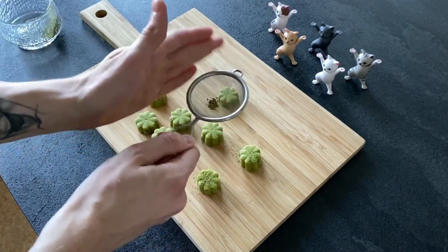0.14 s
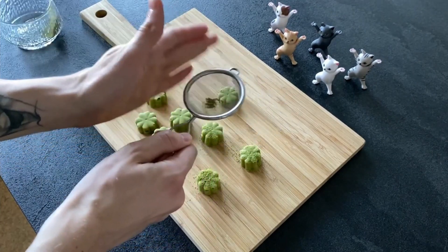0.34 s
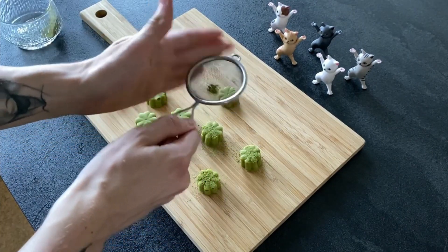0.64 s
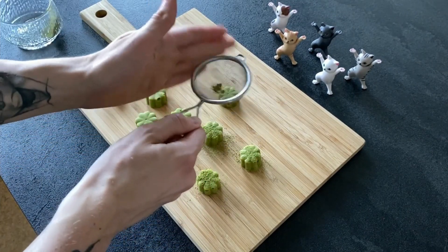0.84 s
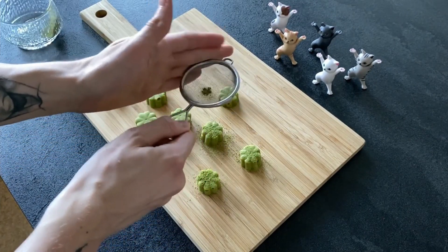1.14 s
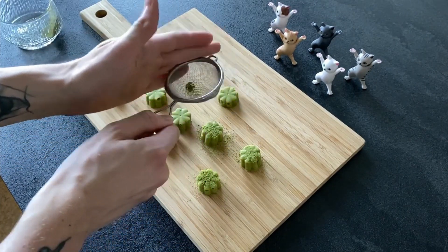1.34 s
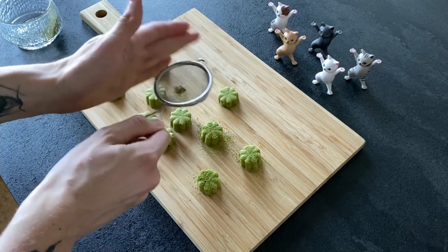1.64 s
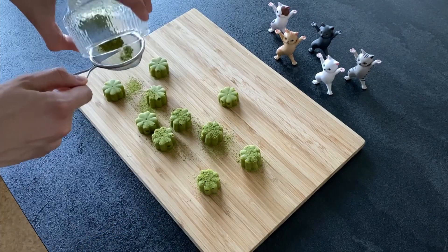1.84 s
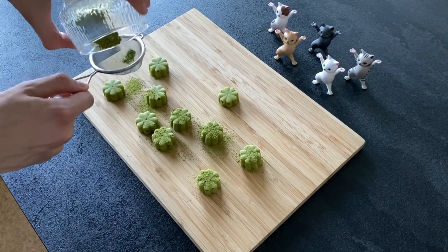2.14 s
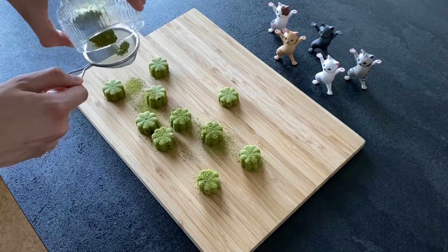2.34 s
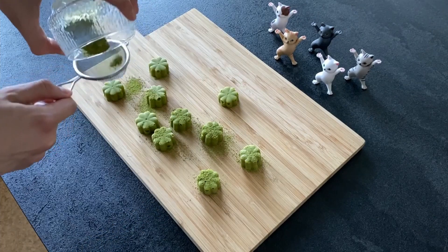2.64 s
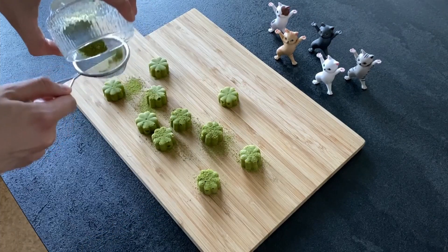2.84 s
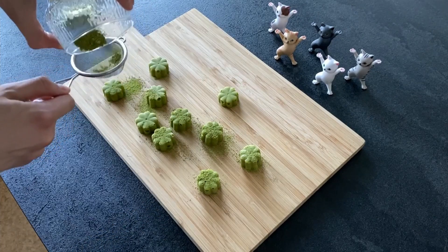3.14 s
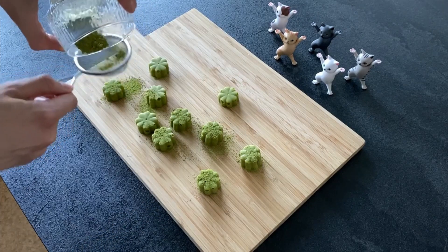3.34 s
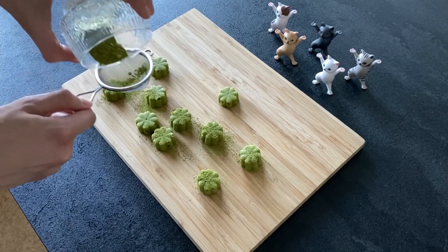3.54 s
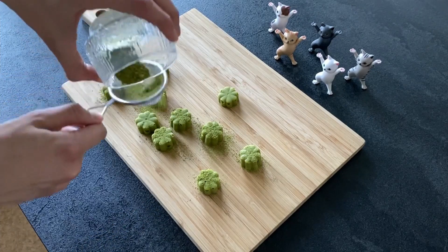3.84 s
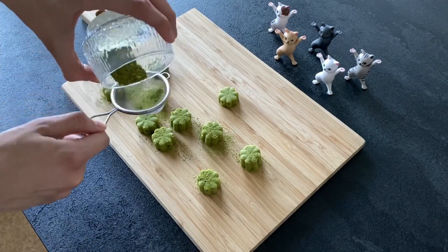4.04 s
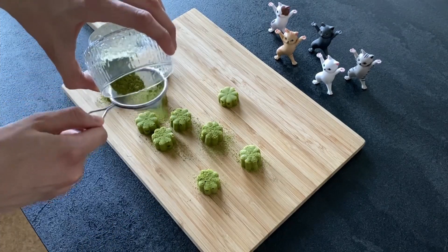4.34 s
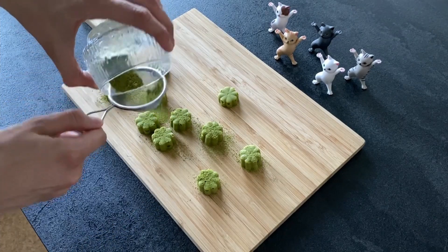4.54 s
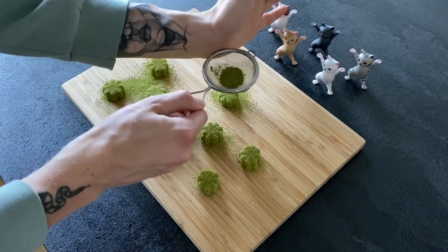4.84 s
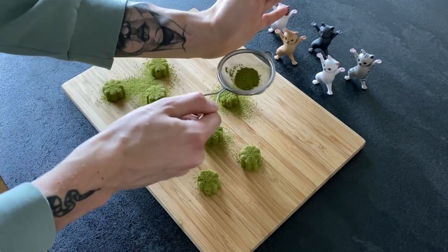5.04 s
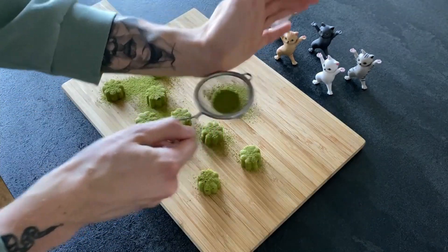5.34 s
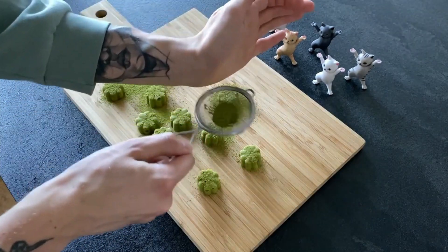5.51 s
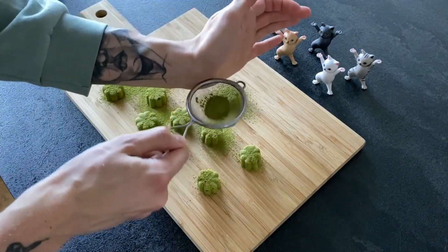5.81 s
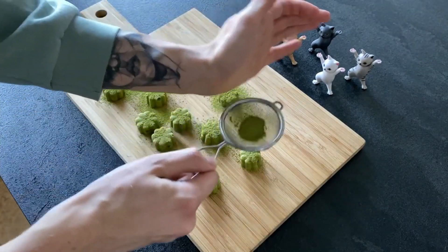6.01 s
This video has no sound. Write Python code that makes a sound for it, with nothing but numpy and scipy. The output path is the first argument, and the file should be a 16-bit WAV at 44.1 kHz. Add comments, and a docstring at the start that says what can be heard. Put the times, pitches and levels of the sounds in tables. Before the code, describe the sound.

Soft sieve pats with faint powder hiss over a low appliance rumble, then abrupt dull, bouncing sieve clinks on a glass jar in a hard kitchen.

```python
"""A low appliance rumble with faint tones, then a small metal sieve patted softly on a palm in a quiet kitchen.
After a hard cut the sieve knocks a hand-held glass jar in dull, bouncing clinks that fill the hard room;
after a second cut only a very faint shake is left over the rumble, which runs throughout.
Rumble and powder are shaped noise; each clink is damped modes and noise cracks, with decaying noise as echo.
Two close microphone ports hear it, with a phase difference that depends on frequency."""
import sys
import numpy as np
from scipy import signal
from scipy.fft import rfft, irfft
from scipy.io import wavfile
from scipy.ndimage import uniform_filter1d

SR = 44100
rng = np.random.default_rng(int(sys.argv[2]) if len(sys.argv) > 2 else 0)


def master(y):
    """Save y as 16-bit WAV."""
    cut = np.clip(np.atleast_2d(y).T, -1, 1)
    pcm = np.round(cut * 32767)  # scale
    wavfile.write(sys.argv[1], SR, pcm.astype(np.int16))


N = 272097


def undb(db):
    """Gain of a level in dB."""
    return 10 ** (np.asarray(db) / 20)


def on_log(table, hz):
    """Reads a table of frequency and value on a log-frequency axis."""
    at, value = np.transpose(table)
    return np.interp(np.log(hz + 1), np.log(at + 1), value)


def band(x, lo_hz, hi_hz):
    """Band-pass, scaled to a standard deviation of 1."""
    edges = [lo_hz, min(hi_hz, .45 * SR)]
    y = signal.sosfilt(signal.butter(2, edges, "band", fs=SR, output="sos"), x)
    return y / np.std(y)


def fall(t, t60):
    """Exponential decay by 60 dB in t60 seconds."""
    return np.exp(-np.log(1000) * t / t60)


def pair(shared, apart, likeness):
    """Left and right from two unrelated signals, alike by the given share (0-1)."""
    c = np.clip(likeness, 0, 1)
    mid = np.sqrt((1 + c) / 2) * shared
    side = np.sqrt((1 - c) / 2) * apart
    return np.array([mid + side, mid - side])


def add(out, x, s):
    """Mixes x into out from time s (seconds) on."""
    i = int(s * SR)
    out[..., i:i + x.shape[-1]] += x[..., :N - i]


def walk(rate_hz):
    """Slow random drift with a standard deviation of 1."""
    k = int(SR / rate_hz)
    steps = np.repeat(rng.standard_normal(N // k + 1), k)
    w = uniform_filter1d(steps, k)[:N]
    return w / np.std(w)


def appliance_noise(t):
    """Steady broadband noise whose low and upper parts waver apart, most alike at the ports in the lows."""
    # Spectrum of the appliance. Each row: frequency in Hz, relative density in dB per Hz.
    spectrum = [(22, -20.5), (31, -20.5), (45, -5), (90, -0.5), (120, 0), (185, -9.5), (290, -15.5),
                (400, -21.5), (480, -22.5), (800, -39.5), (3000, -48.5), (4400, -49.5), (7300, -56),
                (11000, -56.5), (16500, -77)]
    # How alike the two ports hear it. Each row: frequency in Hz, share from 0 to 1.
    likeness = [(130, .98), (290, .8), (640, .1), (3000, .1), (7000, .7), (15000, .4)]
    # Uneven level of the low part, a chance wavering typed out; faster random wavering is added.
    # Each row: time in seconds, level in dB.
    uneven_level = [(0.0, -59.5), (0.65, -59.5), (1.15, -56), (2.68, -58.5), (3.06, -55), (3.61, -58.5),
                    (4.18, -58), (5.53, -58.5), (5.72, -54.5), (6.17, -58)]
    hiss_db = -54  # gain of the upper part, before its wavering
    hz = np.fft.rfftfreq(N, 1 / SR)
    shared, apart = rfft(rng.standard_normal((2, N))) * undb(on_log(spectrum, hz))
    both = pair(shared, apart, on_log(likeness, hz))
    low_share = 1 / (1 + (hz / 500) ** 2)
    low = irfft(both * low_share, N)
    high = irfft(both * (1 - low_share), N)
    low_gain = undb(np.interp(t, *np.transpose(uneven_level)) + 1.5 * walk(11))
    high_gain = undb(hiss_db + 1.2 * walk(6))
    return (low * low_gain + high * high_gain) / np.std(low)


def thin_tones(t):
    """Faint sines whose levels drift slowly."""
    # Tones under the rumble. Each row: frequency in Hz, rms level in dB before the drift.
    tones = [(242, -75), (2832, -100), (3709, -101)]
    out = 0
    for hz, db in tones:
        level = np.sqrt(2) * undb(db + 2 * walk(4))
        out = out + level * np.sin(2 * np.pi * hz * t)
    return out


def whine(t):
    """One faint high sine that briefly grows in smooth swells."""
    # Swells added to the steady whine. Each row: time of the peak in seconds, added amplitude in dB.
    swells = [(5.3, -91), (6.0, -91)]
    whine_hz, steady_db, swell_s = 4447, -100, 0.095  # swell_s: from the peak down to 1/e
    level = undb(steady_db)
    for s, db in swells:
        level = level + undb(db) * np.exp(-((t - s) / swell_s) ** 2)
    return level * np.sin(2 * np.pi * whine_hz * t)


def rumble():
    """The kitchen background: wavering appliance noise, thin tones and a whine."""
    t = np.arange(N) / SR
    return appliance_noise(t) + thin_tones(t) + whine(t)


def palm(swell_s=0.013):
    """A tiny tick of the mesh, then powder sifting through in a short swell of hiss."""
    # Sieve on palm, and one last faint shake. Each row: start in seconds, tick level in dB.
    pats = [(0.1146, -63), (0.3244, -70), (0.5384, -75), (0.7424, -74), (0.9504, -77), (1.1664, -77),
            (1.4204, -71), (1.6304, -76), (5.4394, -82.5)]
    powder_db, powder_per_tick = -62, 0.31  # harder pats shake more powder loose: dB per dB of tick
    out = np.zeros((2, N))
    t = np.arange(4096) / SR
    for s, tick_db in pats:
        # filtered twice for steeper edges
        shared, apart = (band(band(rng.standard_normal(len(t)), 8500, 15000), 8500, 15000) for _ in range(2))
        tick = undb(tick_db) * fall(t, 0.012)
        swell = t / swell_s * np.exp(1 - t / swell_s)
        powder = undb(powder_db + powder_per_tick * tick_db) * swell
        add(out, (tick + powder) * pair(shared, apart, .6), s)
    return out


def clink(ring_db, body_db, treble_db, knock_db, push_s=.0007, scatter_db=1.5, apart_db=-12):
    """One blow cracks and rings every mode, varied by grip and spot; gives direct sound and wall share."""
    # Hand-damped modes of jar and rim. Each row: frequency in Hz, relative level in dB, t60 in seconds.
    jar_modes = [(294, -15.5, 0.017), (574, -12, 0.015), (885, -11, 0.01), (1172, 0.5, 0.015),
                 (1355, -6.5, 0.018), (1761, -2.5, 0.02), (2034, -9.5, 0.038), (2842, -6, 0.0096),
                 (3022, -7.5, 0.02), (3191, -2, 0.019), (3404, -6, 0.016), (3620, -9.5, 0.012),
                 (3880, -18, 0.01), (5276, 0, 0.013), (5750, -5, 0.0077), (7930, -6.5, 0.017),
                 (8680, -7, 0.0093), (10100, -25.5, .012), (11090, -8.5, 0.026), (11400, -4, 0.014),
                 (12350, -18, 0.11), (12990, -9.5, 0.011), (14200, -10.5, .012), (15600, -17, .015)]
    # Borders in Hz between the four parts: knock, body, ring, treble.
    part_edges_hz = (2400, 3900, 6200)
    # Broad crack of mesh and contact. Each row, one a part: low edge in Hz, high edge in Hz, level in dB.
    crack_bands = [(460, 5500, 0.5), (2223, 3900, 5.5), (3670, 8360, -5.5), (7450, 21000, 9.5)]
    # Sent to the walls, against the direct sound. Each row, one a part: modes in dB, crack in dB.
    to_walls = [(0.5, -19.5), (1.5, -22.5), (-4.5, -12.5), (1.5, -15.5)]
    modes_over_crack_db, crack_t60_s = 5.5, .009
    hz, db, t60 = np.array(jar_modes).T[:, :, None]
    part = np.searchsorted(part_edges_hz, hz)
    parts_db = np.array([knock_db, body_db, ring_db, treble_db])
    t = np.arange(2048) / SR

    level_chance, pitch_chance = rng.standard_normal((2,) + hz.shape)
    phase = rng.uniform(0, 2 * np.pi, hz.shape)
    gain = undb(db + parts_db[part] + modes_over_crack_db + scatter_db * level_chance)
    pitch = hz * (1 + .005 * pitch_chance)
    modes = gain * np.sin(2 * np.pi * pitch * t + phase) * fall(t, t60)

    modes_wall_db, crack_wall_db = np.transpose(to_walls)
    impulse = 1. * (t == 0)
    cracks, clicks = [], 0
    for part_db, (lo, hi, own_db), wall_db in zip(parts_db, crack_bands, crack_wall_db):
        noise = band(rng.standard_normal(len(t)), lo, hi)
        cracks.append(undb(part_db + own_db) * noise * fall(t, crack_t60_s))
        # from all around, the crack averages out to an even click
        clicks = clicks + undb(part_db + own_db + wall_db) * band(impulse, lo, hi)

    voices = np.vstack([modes, cracks]) * (1 - np.exp(-t / push_s))  # the contact takes a moment
    # each voice radiates its own way, so the ports get unequal shares
    lean = rng.standard_normal((len(voices), 1))
    side = undb(apart_db) * (lean * voices).sum(axis=0)
    direct = voices.sum(axis=0) + np.array([side, -side])
    walls = (undb(modes_wall_db[part]) * voices[:len(hz)]).sum(axis=0) + clicks
    return direct, walls


def jar():
    """All blows on the jar, each with its own echo since the hands move, heard only between the two cuts."""
    # Sieve on jar, bounces included; the first falls before the cut, so only its tail is heard.
    # Each row: start in seconds, ring level in dB, squareness in dB (0 usual, below 0 glancing).
    blows = [(1.68, -14, 0.5), (1.8794, -26.5, -10.5), (1.882, -32, 11), (1.8953, -25.5, -1),
             (2.0932, -23.5, 1.5), (2.0974, -15.5, 0), (2.326, -24.5, -8), (2.3298, -23.5, 3.5),
             (2.6181, -12, 1), (2.836, -16.5, -3), (2.8429, -20.5, 3), (3.0785, -13, 1.5), (3.3103, -25, 2),
             (3.3226, -20, 2), (3.759, -16, 0.5), (3.9698, -24, 9.5), (3.984, -19, -3), (4.2084, -9, 0),
             (4.2473, -32, -3.5), (4.2812, -23, -7), (4.4223, -10, -1), (4.4545, -36, 4.5),
             (4.4874, -23, -7.5), (4.6481, -19, 3), (4.6556, -19, -5.5), (4.7058, -26, -3)]
    # Echo bands of the hard room. Each row: frequency in Hz, t60 in seconds, relative level in dB.
    kitchen = [(527, 0.76, -31), (977, 0.52, -25.5), (2013, 0.57, -26), (3300, 0.51, -30),
               (5060, 0.54, -30.5), (7950, .42, -29), (11490, 0.32, -30), (15000, 0.16, -37)]
    # How alike the two ports hear the echo. Each row: frequency in Hz, share from 0 to 1.
    likeness = [(500, .6), (1000, .5), (2000, .6), (3300, .55), (5300, .8), (8000, .65), (15000, .6)]
    # Start and end of the clinking shot, in seconds.
    shot_start, shot_end = (1.81, 4.81)
    body_db, treble_db = -8, -5.5  # against the ring, for a usual blow
    treble_per_square = .55  # dB per dB of squareness; the body follows it fully
    knock_db, knock_per_ring = -25, 0.66  # the dull knock grows more slowly than the ring
    echo_db, early_db, early_t60_s = -18.5, -0.5, .08  # early: a short first decay atop the long one
    echo_per_ring = -.1  # hard blows aim more of their sound at the microphone
    echo_per_square = 0.34  # glancing blows reach the walls less
    t = np.arange(SR * 3 // 4) / SR
    hiss = [[band(rng.standard_normal(2 * SR), hz / 1.51, hz * 1.006) for _ in range(2)]
            for hz, _, _ in kitchen]
    arrive = 1 - np.exp(-(t / 0.003) ** 2)  # walls answer after a few ms
    early = undb(early_db) * fall(t, early_t60_s)
    out = np.zeros((2, N))
    for s, ring_db, square_db in blows:
        direct, walls = clink(
            ring_db,
            body_db=ring_db + body_db + square_db,
            treble_db=ring_db + treble_db + treble_per_square * square_db,
            knock_db=knock_db + knock_per_ring * ring_db)
        blow_echo_db = echo_db + echo_per_ring * ring_db + echo_per_square * square_db
        start = rng.integers(SR)  # another stretch of the hiss for each blow
        echo = 0
        for (shared, apart), (hz, t60, band_db) in zip(hiss, kitchen):
            shape = undb(band_db + blow_echo_db) * arrive * (fall(t, t60) + early)
            tail = pair(shared[start:][:len(t)], apart[start:][:len(t)], on_log(likeness, hz))
            echo = echo + shape * tail
        add(out, direct, s)
        add(out, signal.fftconvolve(echo, walls[None], axes=1), s)
    now = np.arange(N) / SR
    inside = np.minimum(now - shot_start, shot_end - now)
    return out * np.clip(inside / 0.0023, 0, 1)  # cuts soften over 2.3 ms


def scene():
    """Everything at the two ports."""
    return jar() + palm() + rumble()


def record(dry):
    """The path round the casing shifts phase between the ports; peaks round off, the top fades and is cut."""
    # Phase between the ports. Each row: frequency in Hz, lead of the left port in radians.
    port_lead = [(0, 0), (2070, .1), (2840, 1.4), (3790, .4), (5340, .5), (6890, 3.1), (8180, 3.7),
                 (9730, 5.9), (16500, 12.6)]
    top_hz = 16750
    at, lead = np.transpose(port_lead)
    half = np.interp(np.fft.rfftfreq(N, 1 / SR), at, lead) / 2
    turn = np.exp(1j * np.array([half, -half]))
    ports = irfft(rfft(dry) * turn, N) * undb([[-.2], [.2]])  # the right is a touch hotter
    rounded = np.tanh(.9 * ports) / .9
    faded = signal.sosfilt(signal.ellip(5, 1, 17, 15700, fs=SR, output="sos"), rounded)
    return signal.sosfilt(signal.ellip(10, .2, 80, top_hz, fs=SR, output="sos"), faded)


dry = scene()
out = record(dry)
master(out)
```